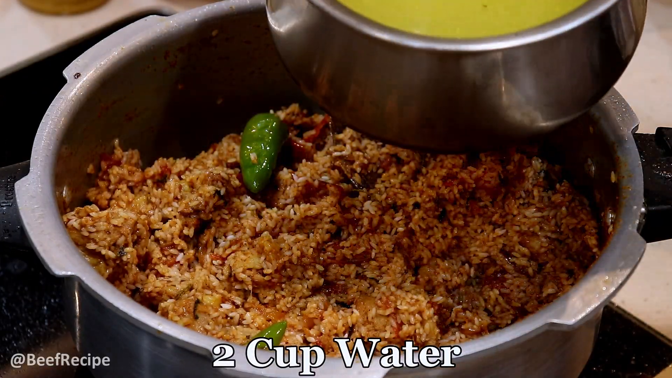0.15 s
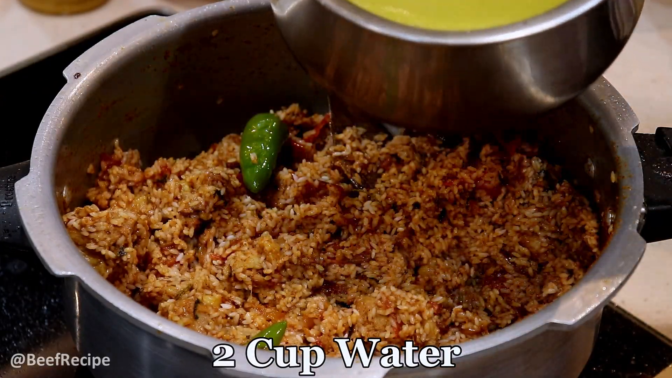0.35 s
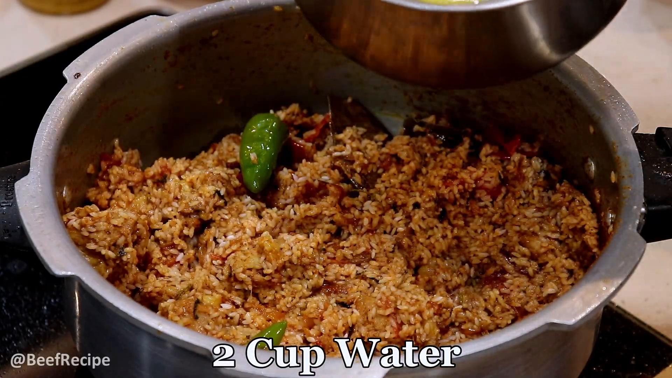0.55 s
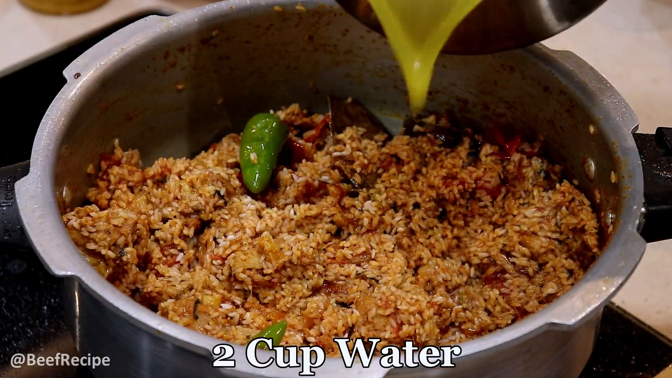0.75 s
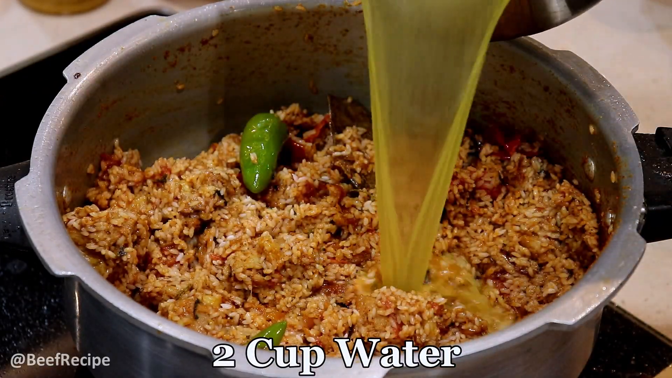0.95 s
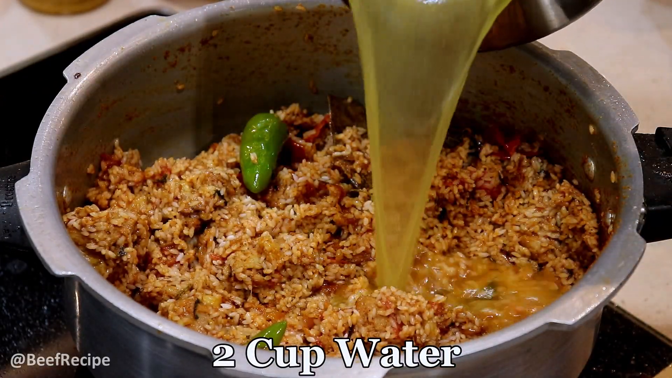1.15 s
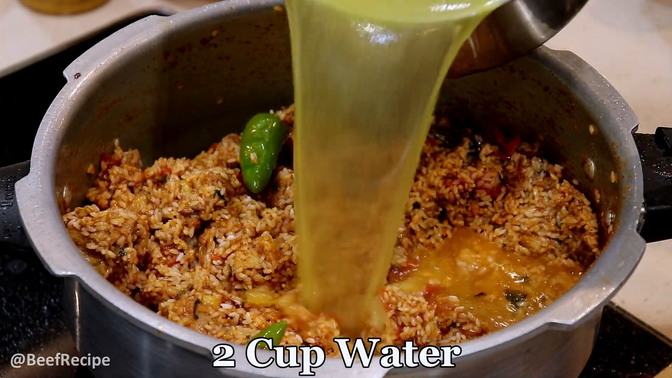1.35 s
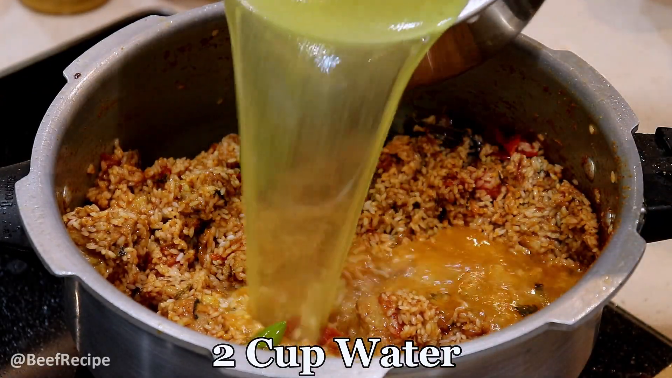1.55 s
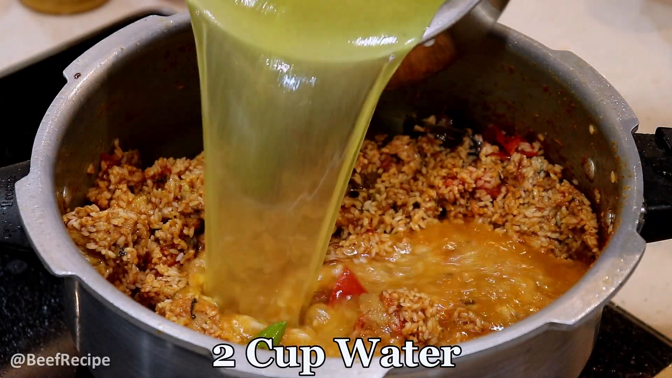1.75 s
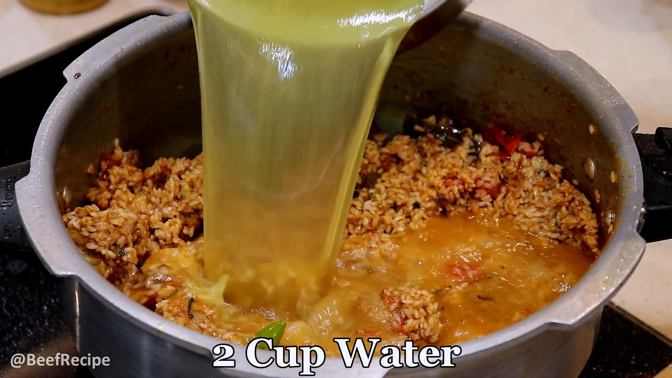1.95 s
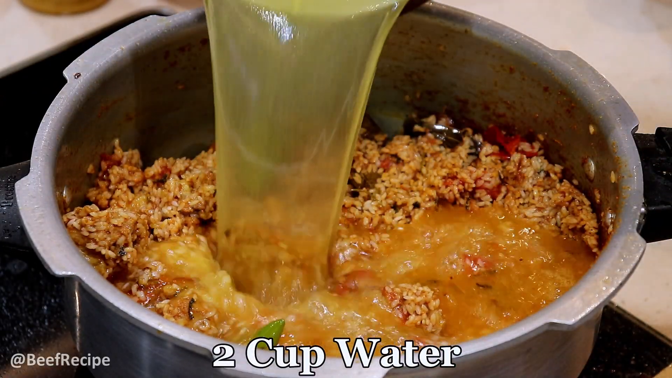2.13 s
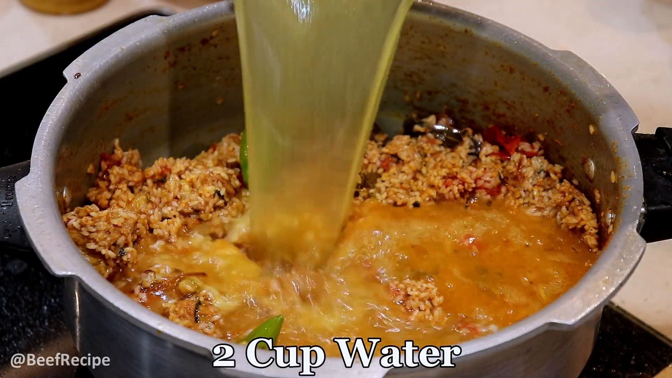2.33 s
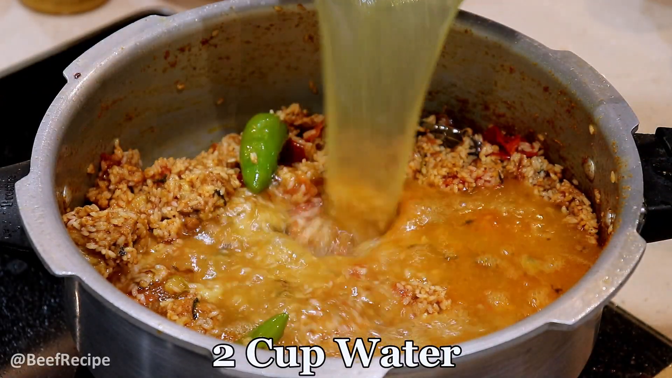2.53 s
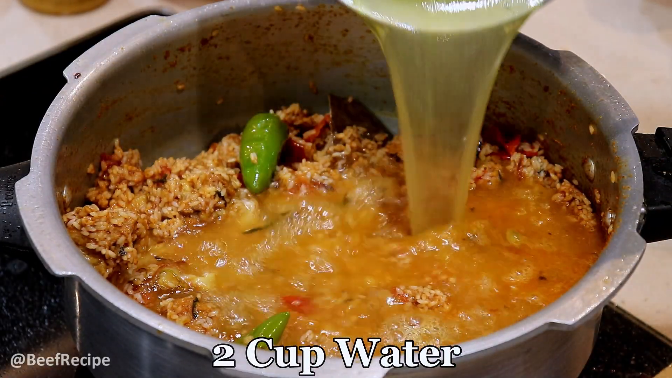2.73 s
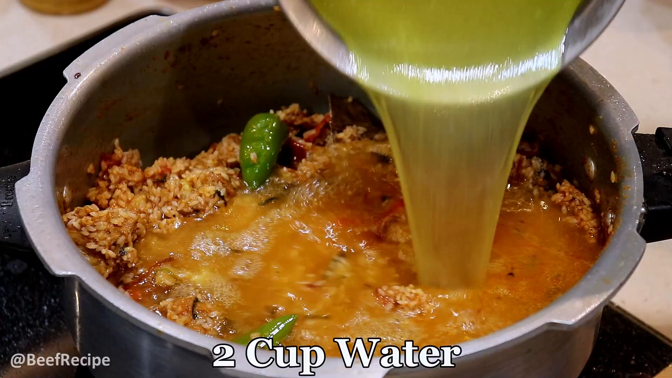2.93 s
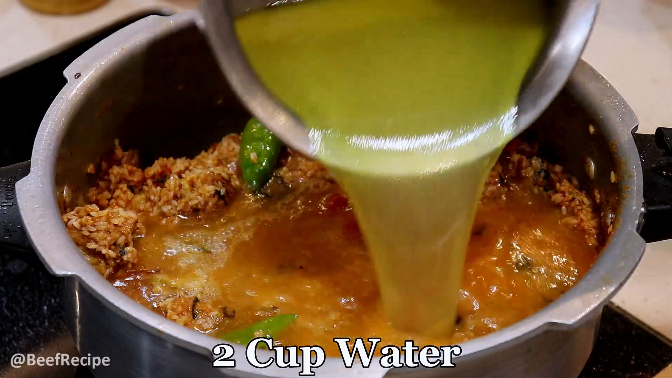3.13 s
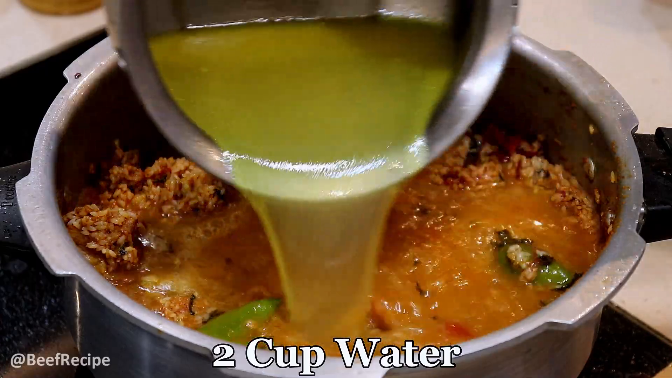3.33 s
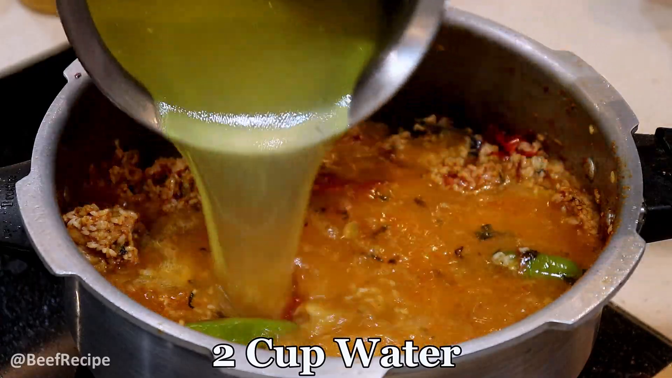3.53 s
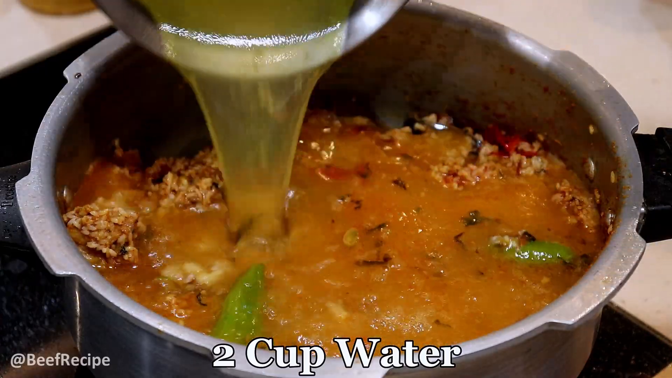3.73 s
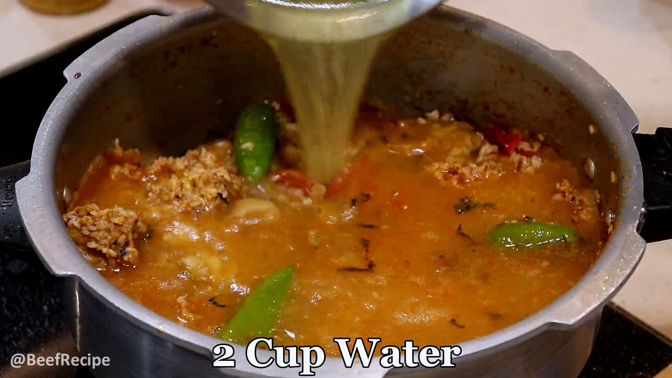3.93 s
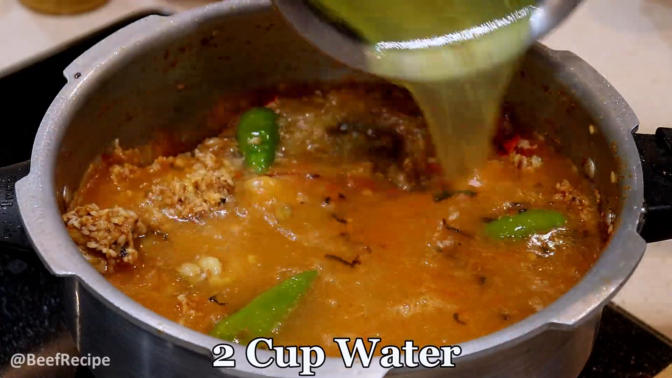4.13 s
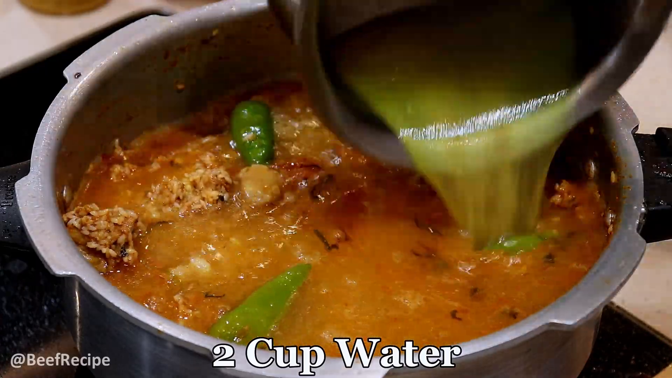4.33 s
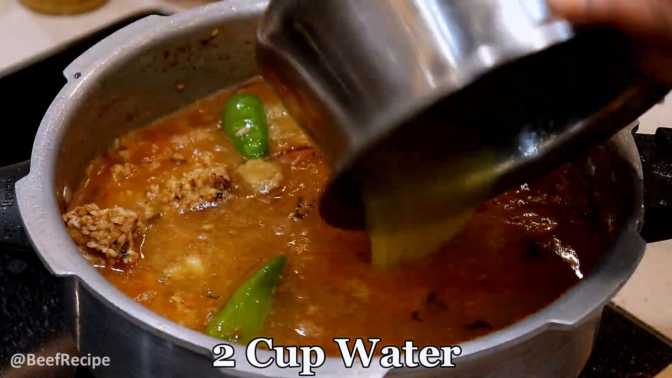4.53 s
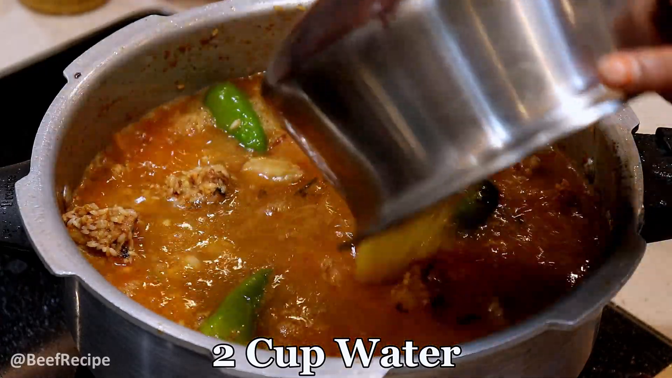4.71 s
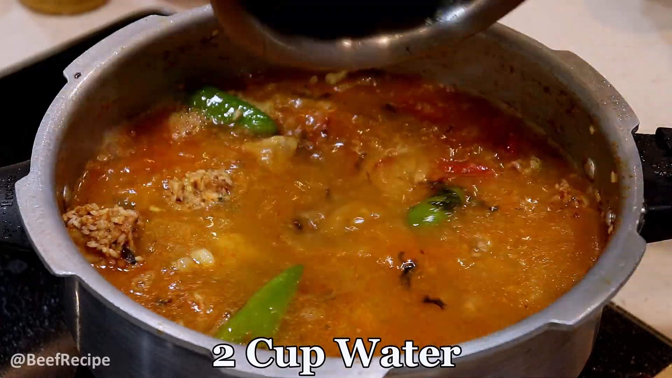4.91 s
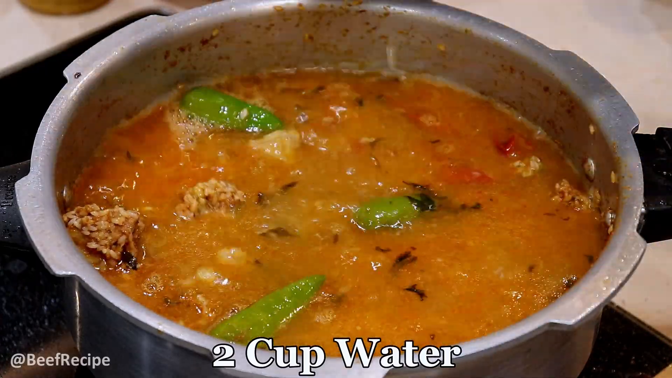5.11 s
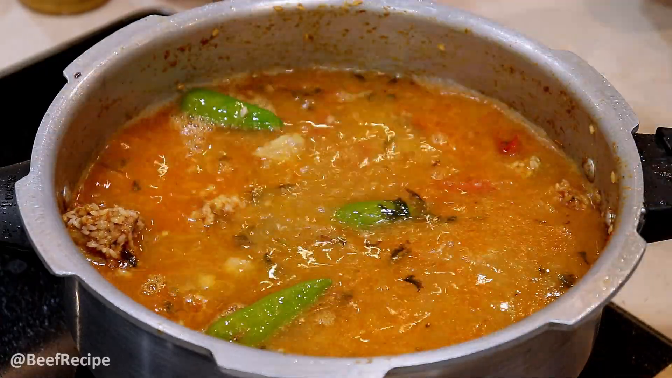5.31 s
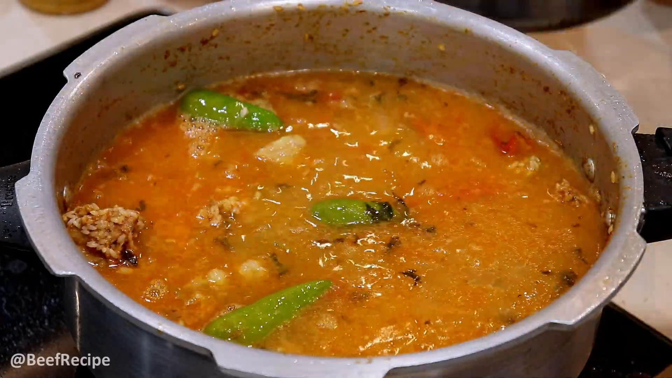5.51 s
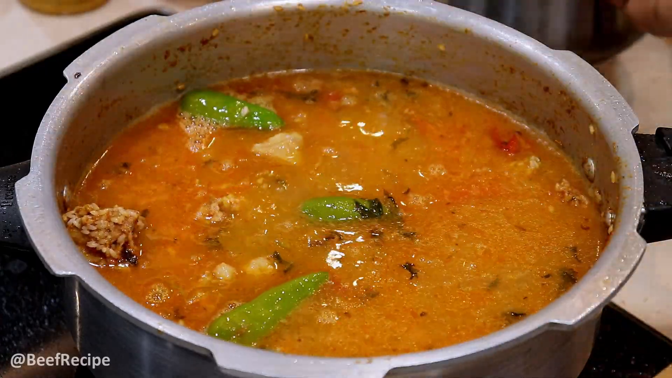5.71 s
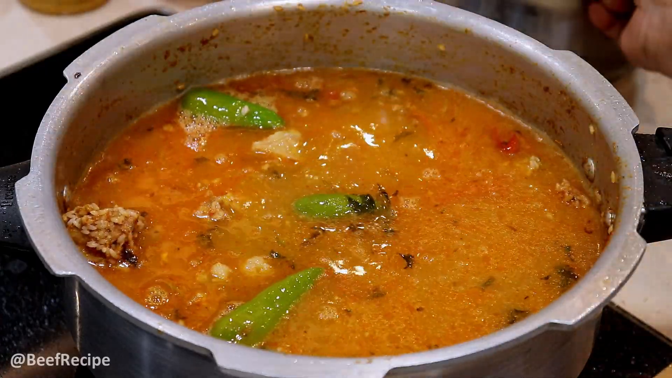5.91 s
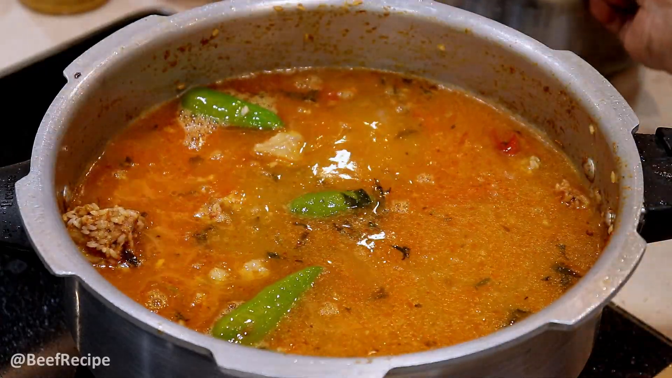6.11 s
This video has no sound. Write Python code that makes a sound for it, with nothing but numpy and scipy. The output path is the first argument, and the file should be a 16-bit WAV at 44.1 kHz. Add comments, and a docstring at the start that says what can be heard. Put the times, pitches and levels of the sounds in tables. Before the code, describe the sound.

Heard close from above a cooking pot in a small kitchen: low fan air and very faint sizzle, a sudden tiny snap, then pouring water. Hot rice crackles and hisses louder and louder, drops spit sharply, steam squeaks briefly and bubbles gurgle. The frying settles after the pour, a few bubbles plop, and a hollow steel vessel rings and rattles as it is set down.

```python
"""A hot pressure cooker of fried rice sizzles as water is poured in from a steel vessel; a kitchen fan runs.
Dense pops over hiss make the sizzle, which flares where water meets hot rice or bare metal, then settles.
A sharp tick comes before the pour; bursts of noise spit, and narrow noise whistles as steam in the rice.
Resonant noise and rising sine bubbles make the gurgling stream; fan air is shaped noise with motor tones.
At the end, decaying sine partials ring the empty vessel as it clanks, rocks and settles on the counter."""
import sys
import numpy as np
from scipy import signal
from scipy.fft import rfft, irfft
from scipy.io import wavfile

SR = 44100
rng = np.random.default_rng(int(sys.argv[2]) if len(sys.argv) > 2 else 0)


def to_wav(s):
    """Save 16-bit WAV."""
    ch = np.atleast_2d(s).T  # columns
    pcm = np.round(np.clip(ch, -1, 1) * 32767)  # PCM
    wavfile.write(sys.argv[1], SR, pcm.astype(np.int16))


N = 271788  # samples
TIME = np.arange(N) / SR


def gain_of(db):
    """Turns decibels into an amplitude factor."""
    return 10 ** (np.asarray(db) / 20)


def evened(x):
    """Scales to rms 1."""
    return x / np.sqrt(np.mean(x ** 2) + 1e-20)


def read(points, hz):
    """Reads a spectrum joined by straight lines over log frequency."""
    f, value = np.transpose(points)
    return np.interp(np.log(hz + 1), np.log(f + 1), value)


def add(mix, s, sound):
    """Mixes a sound in at s seconds, cut off at the end of the mix."""
    part = mix[max(round(s * SR), 0):][:len(sound)]
    part += sound[:len(part)]


def coloured(x, colour_db):
    """Filters x by a function from Hz to dB; rms 1."""
    hz = np.fft.rfftfreq(len(x), 1 / SR)
    return evened(irfft(rfft(x) * gain_of(colour_db(hz)), len(x)))


def resonate(x, hz, width):
    """A resonance, applied twice for steep skirts; rms 1."""
    r = np.exp(-np.pi * abs(width) * np.sqrt(2) / SR)
    pole = r * np.exp(2j * np.pi * hz / SR)
    return evened(signal.lfilter([1], np.poly([pole, pole]), x).real)


def dying(t, t60):
    """Exponential decay, falling 60 dB in t60 seconds."""
    return np.exp(-np.log(1000) * t / t60)


def burst(centre_hz, octaves, t60):
    """A sudden puff of noise around one pitch, dying away exponentially."""
    t = np.arange(SR // 2) / SR

    def band_db(f):
        return -10 * np.log10(1 + (np.log2((f + 1) / centre_hz) / octaves) ** 4)

    puff = coloured(rng.standard_normal(len(t)), band_db)
    return puff * dying(t, t60)


def patches(shape, frames, bins):
    """Smooth chance over time and frequency, rms 1; larger frames and bins make broader patches."""
    a, b = np.fft.fftfreq(shape[0])[:, None], np.fft.rfftfreq(shape[1])
    smoothing = np.exp(-(a * frames) ** 2 - (b * bins) ** 2)
    return evened(np.fft.irfft2(np.fft.rfft2(rng.standard_normal(shape)) * smoothing, shape))


def kitchen(x, t60, first_s=.003):
    """Sparse echoes from the pot wall, tiles and cupboards: random taps that die away."""
    t = np.arange(SR // 2) / SR
    hits = rng.random(len(t)) < 2000 / SR  # about 2000 echoes per second
    taps = rng.choice([-1, 1], len(t)) * hits * (t > first_s) * dying(t, t60)
    return signal.fftconvolve(x, taps / np.linalg.norm(taps))[:N]


# Steady frying of the whole pot, rising as it gets wet and sinking as it cools:
# (time [s], level [dB], fine spray [dB re level])
SIMMER = [(0, -49, 1), (1.0, -49, 1.5), (1.45, -35, 0.5), (2.9, -32.5, -2), (4.5, -29.5, -1.5),
          (5.0, -34, -1.5), (5.93, -43.5, 0.5)]
# Flares where water reaches hot rice or bare metal:
# (start [s], length [s], level [dB], fine spray [dB re level], coarse boiling [dB re level])
FLARES = [(0.742, 0.62, -54.5, -4, 13.5), (1.32, 0.42, -37, 3.5, -3), (1.57, 0.16, -40, -2, 8.5),
          (1.903, 0.16, -38.5, 1, -11), (2.264, 0.29, -30, 1, -0.5), (2.377, .16, -30, 0.5, -1.5),
          (2.56, 0.19, -31, -7, 0), (2.954, 0.59, -34.5, 2, -9.5), (3.547, 0.79, -29, -2.5, 3.5),
          (3.712, 0.54, -22.5, 3, -2), (3.964, .2, -25.5, 2, -8), (4.78, 0.091, -37, -7, -7),
          (5.09, 0.076, -35.5, 0, -11), (5.32, .2, -40, 3, 4.5)]
SIMMER_BOIL_DB = 1.7  # coarse boiling relative to the simmer
FLARE_RISE_S, FLARE_T60 = 0.083, 0.95  # seconds; the decay starts after the flare's length
SPRAY_FADE_DB_PER_S = 1.5  # the metal cools, so fine spray dies before the sizzle does


def frying_levels(t):
    """Sums simmer and flare power: sizzle in dB, then fine spray and coarse boiling in dB relative to it."""
    s, simmer_db, mist_db = np.transpose(SIMMER)
    power = gain_of(np.interp(t, s, simmer_db)) ** 2
    spray = power * gain_of(np.interp(t, s, mist_db)) ** 2
    boil = power * gain_of(SIMMER_BOIL_DB) ** 2
    for start, length, db, spray_db, boil_db in FLARES:
        age = np.maximum(t - start, 0)
        rise = np.minimum(age / FLARE_RISE_S, 1)
        flare = gain_of(db) * rise * dying(np.maximum(age - length, 0), FLARE_T60)
        power = power + flare ** 2
        spray = spray + (flare * gain_of(spray_db - SPRAY_FADE_DB_PER_S * age)) ** 2
        boil = boil + (flare * gain_of(boil_db)) ** 2
    return 10 * np.log10([power, spray / power, boil / power])


# Basic colour of the sizzle: (frequency [Hz], relative density [dB per Hz])
SIZZLE_COLOUR = [(200, -38), (650, -6), (900, -6), (1200, -4), (1700, -3.5), (2200, -4), (2800, 0),
                 (4400, -0.5), (5000, -1.5), (6800, -1), (8800, -7), (9800, -7.5), (13000, -13.5),
                 (16000, -21)]
# Pot air lifting and hollowing the sizzle:
# (centre [Hz], width [Hz], lift over dry rice [dB], lift when full of water [dB])
POT_AIR = [(670, 180, -7, -11), (784, 87, 5, -15.5), (874, 66, -1.5, 10.5), (1000, 140, 0, 1),
           (1170, 82, -2.5, -8), (1300, 160, 1.5, 0), (1710, 110, 3.5, -2.5), (2070, 460, -1, 1),
           (2250, 630, 1.5, -3), (2780, 240, 1.5, 1), (2930, 340, -1.5, 1.5), (3240, 160, -0.5, -5),
           (3450, 280, 1.5, 0), (4080, 270, 0, -1.5), (4400, 210, 2, 1), (5570, 470, 1, 1.5),
           (7200, 500, 0.5, 0.5), (8440, 330, 3, 4)]


def sizzle(pops_per_s=9000, size_db=3.5, pop_share=0.36, patch_db=1.0, flicker_db=0.49,
           filling_s=3.78, filled_s=3.96):
    """Thousands of tiny steam bubbles burst over a hiss; clusters of like size come and go."""
    sizes = np.minimum(rng.exponential(1, N), 3.5)
    happens = rng.random(N) < pops_per_s / SR
    pops = rng.choice([-1, 1], N) * gain_of(size_db * sizes) * happens
    share = np.clip(pop_share, 0, 1)  # of the power
    frying = np.sqrt(share) * evened(pops) + np.sqrt(1 - share) * rng.standard_normal(N)
    hz, t, z = signal.stft(frying, SR, nperseg=512, noverlap=384)
    hz = hz[:, None]
    level, spray, boil = frying_levels(t)
    # fresh water on bare metal throws fine spray; deeper water boils coarsely
    colour = read(SIZZLE_COLOUR, hz) + spray * read([(6000, 0), (12000, 1)], hz)
    colour = colour + boil * read([(1800, 1), (3500, 0)], hz)
    # once water covers the rice, the air above it rings more clearly
    full = np.clip((t - filling_s) / (filled_s - filling_s), 0, 1)
    for centre, width, dry_db, full_db in POT_AIR:
        lift_db = dry_db + full * (full_db - dry_db)
        colour = colour + lift_db * np.exp(-2 * ((hz - centre) / width) ** 2)
    # the main band sets the loudness, so the colour leaves the level alone
    main = (hz > 2500) & (hz < 9000)
    colour = colour - 10 * np.log10(np.mean(gain_of(colour) ** 2 * main, 0))
    clusters = patch_db * patches(z.T.shape, frames=13.3, bins=9.3)
    flicker = flicker_db * patches(z.T.shape, frames=4.6, bins=200)
    z = z * gain_of(colour + level + (clusters + flicker).T)
    return signal.istft(z, SR, nperseg=512, noverlap=384)[1][:N]


# Motor tones: (frequency [Hz], level [dB])
HUM = [(301.5, -60.5), (398.6, -52)]
# Colour of the rush of air: (frequency [Hz], relative density [dB per Hz])
FAN = [(25, -26), (55, -33), (78, -15), (100, -19), (125, -9), (180, -7.5), (230, -7.5), (300, -5.5),
       (350, -8), (400, -10), (450, -9.5), (620, -8), (900, -12.5), (1650, -13.5), (2100, -24), (4000, -44)]
FAN_DB = -46  # level of the rush


def fan():
    """A rush of air as shaped noise, with motor tones whose pitch drifts slightly."""
    rush = coloured(rng.standard_normal(N), lambda f: read(FAN, f))
    drift_hz = .8 * coloured(rng.standard_normal(N), lambda f: -20 * np.log10(1 + (f / 5) ** 2))
    tones = np.zeros(N)
    for hz, db in HUM:
        tone = np.sin(2 * np.pi * np.cumsum(hz + drift_hz) / SR)
        tones += gain_of(db) * evened(tone)
    return gain_of(FAN_DB) * rush + tones


TICK_S, TICK_DB, TICK_HZ = .2536, -10.5, 6250


def tick(snap_t60=0.00075, crack_db=-17, crack_t60=0.011, tail_db=-32, tail_t60=.07):
    """One sharp snap before the pour: a very short sine with a crack and a bright tail of noise."""
    t = np.arange(SR // 2) / SR
    snap = np.sin(2 * np.pi * TICK_HZ * t) * dying(t, snap_t60)
    crack = gain_of(crack_db) * burst(TICK_HZ, octaves=.65, t60=crack_t60)
    tail = gain_of(tail_db) * burst(TICK_HZ, octaves=0.55, t60=tail_t60)
    out = np.zeros(N)
    add(out, TICK_S, gain_of(TICK_DB) * (snap + crack + tail))
    return out


# The loudest drops spitting on hot metal: (time [s], level [dB], centre [Hz], t60 [s])
SPITS = [(.388, -44, 4000, .076), (1.04, -38.5, 6900, .06), (1.155, -38, 5900, .06),
         (1.1988, -34, 7540, .09), (1.348, -28, 5670, .06), (1.385, -34.5, 9400, 0.27),
         (1.94, -30, 6500, .12), (3.092, -25, 6760, .06), (3.1924, -22, 5360, 0.15),
         (4.103, -17.5, 5300, 0.072), (4.146, -16.5, 5700, .09)]
SPIT_OCTAVES = 0.31  # bandwidth of the loudest drops


def spits(count=18, first_s=1.15, last_s=1.7, small_db=1, small_hz=5800, spread_octaves=2,
          small_octaves=0.16, small_t60=0.045):
    """Single drops flash into steam; many small ones scatter as the water first meets the hot pot."""
    out = np.zeros(N)
    for s, db, hz, t60 in SPITS:
        add(out, s, gain_of(db) * burst(hz, SPIT_OCTAVES, t60))
    for when, pitch in rng.random((count, 2)):
        s = first_s + when * (last_s - first_s)
        hz = small_hz * 2 ** (spread_octaves * (pitch - .5))
        level_db = frying_levels(s)[0] + small_db  # small drops follow the sizzle
        add(out, s, gain_of(level_db) * burst(hz, small_octaves, small_t60))
    return out


# Steam squeezing through the rice: (start [s], length [s], pitch [Hz], level [dB])
STEAM = [(0.773, 0.31, 1470, -49.5), (0.992, 0.085, 2730, -55), (1.102, .14, 5700, -45.5),
         (1.168, .2, 3510, -46.5), (1.273, .08, 2200, -45), (1.339, .5, 3460, -40.5),
         (1.67, 0.17, 5240, -37), (2.361, .18, 2750, -35.5), (2.382, .32, 3420, -43), (2.59, .2, 4430, -35),
         (2.596, .17, 6200, -34.5), (2.991, 0.23, 2600, -40.5), (3.01, 0.071, 6340, -37),
         (3.1, .06, 8050, -34), (3.202, 0.41, 3480, -36), (3.205, 0.36, 4490, -36), (3.362, 0.1, 3940, -35),
         (3.992, 0.086, 6230, -23), (4.107, 0.037, 7500, -21.5)]
# base width, widening with pitch; above BREATHY_HZ whistles widen quickly into a hiss
WHISTLE_WIDTH_HZ, BREATHY_HZ = 150, 4440


def steam(fade=0.2, sputter_db=2.5, sputter_hz=60):
    """Each pocket of steam gives a brief, sputtering whistle of narrow noise; high ones are breathier."""
    out = np.zeros(N)
    for start, length, hz, db in STEAM:
        size = max(int(length * SR), 100)
        width = WHISTLE_WIDTH_HZ * (1 + (hz / BREATHY_HZ) ** 4)
        sputter = coloured(rng.standard_normal(SR), lambda f: -20 * np.log10(1 + (f / sputter_hz) ** 4))
        breath = rng.standard_normal(SR) * gain_of(sputter_db * sputter)
        whistle = evened(resonate(breath, hz, width)[-size:])
        add(out, start, gain_of(db) * whistle * signal.windows.tukey(len(whistle), fade))
    return out


def bubble(hz, cycles, rise=0.052):
    """Trapped air rings briefly, its pitch rising as it surfaces."""
    t, life = np.arange(SR // 8) / SR, cycles / hz
    ring = np.sin(2 * np.pi * hz * t * (1 + rise * t / life))
    return ring * dying(t, life) * (1 - np.exp(-t * hz))


# The falling stream: (time [s], level [dB])
STREAM = [(.9, -70), (1.3, -49.5), (1.7, -47.5), (2.5, -45.5), (3.1, -41), (4.8, -43), (5.9, -50.5)]
# Hollow of the pot under the stream: (centre [Hz], width [Hz], relative level [dB])
HOLLOW = [(167, 97, -8), (290, 110, -8.5), (384.6, 83, 1), (460, 89, -4.5), (800, 133, -2), (886, 240, -7)]
# Large air bubbles under the stream: (time [s], pitch [Hz], level [dB])
GULPS = [(1.158, 755, -37), (1.172, 1110, -30), (4.958, 930, -25.5), (5.04, 950, -27)]


def stream(count=420, bubble_db=-5, size_db=5.0, lowest_hz=90):
    """The stream churns in the hollow of the pot, as resonant noise, and drags air bubbles under."""
    churn = sum(gain_of(db) * resonate(rng.standard_normal(N), hz, w) for hz, w, db in HOLLOW)
    low_cut = signal.butter(2, lowest_hz, "high", fs=SR, output="sos")
    churn = evened(signal.sosfilt(low_cut, churn))
    bubbles = np.zeros(N)
    for when, smallness, strength in rng.random((count, 3)):
        loudness = gain_of(-size_db * np.log(strength + 0.0089))  # a few are much louder
        add(bubbles, when * N / SR, loudness * bubble(650 * 4 ** smallness, cycles=13))
    level = gain_of(np.interp(TIME, *np.transpose(STREAM)))
    out = level * (churn + gain_of(bubble_db) * evened(bubbles))
    for s, hz, db in GULPS:
        add(out, s, gain_of(db) * bubble(hz, cycles=37))
    return out


# Ring of the steel vessel: (frequency [Hz], relative level [dB], t60 [s])
VESSEL = [(387, -29, 1.5), (775, -19, 0.15), (926, -7.5, 0.14), (1020.5, -0.5, 0.69), (1414, -15, 0.63),
          (1750, -30, .6), (2140, -28.5, .39), (2420, -32, .15), (2397, -10.5, 0.26), (2446, -15, 0.39),
          (3070, -26, .24), (3140, -20.5, 0.25), (4200, -32, .4), (4530, -24, 0.44), (5570, -26, .35),
          (6860, -26, .15), (7500, -36, .2), (8317, -35, .49)]
# The vessel rocks on the counter and settles: (time [s], ring [dB], thud [dB], scrape [dB])
KNOCKS = [(5.9856, -39, -27.5, -57), (5.9904, -15.5, -18.5, -32.5), (6.029, -18, -39, -49),
          (6.093, -24.5, -32.5, -41), (6.104, -28, -54, -62)]


def clank(counter_db=-17, counter_hz=155, thud_hz=840, thud_t60=0.035, damped_t60=0.048):
    """The empty vessel rings as the counter thuds; each contact damps the last ring and starts another."""
    rings, blows, t = np.zeros(N), np.zeros(N), np.arange(SR // 2) / SR
    next_contact = [row[0] for row in KNOCKS[1:]] + [np.inf]
    for (s, ring_db, thud_db, scrape_db), stop in zip(KNOCKS, next_contact):
        ring = sum(gain_of(db) * np.sin(2 * np.pi * hz * t) * dying(t, t60) for hz, db, t60 in VESSEL)
        damping = dying(np.maximum(s + t - stop + 0.0037, 0), damped_t60)  # sets in 3.7 ms early
        ring = ring * (1 - np.exp(-t / 0.00067)) * damping
        thud = np.sin(2 * np.pi * thud_hz * t) * dying(t, thud_t60) * (1 - np.exp(-t * thud_hz))
        boom = burst(centre_hz=counter_hz, octaves=0.36, t60=0.55) * (1 - np.exp(-t / 0.0057))
        scrape = burst(centre_hz=5340, octaves=0.42, t60=0.089)
        add(rings, s, gain_of(ring_db) * ring)
        add(blows, s, gain_of(thud_db) * (thud + gain_of(counter_db) * boom))
        add(blows, s, gain_of(scrape_db) * scrape)
    # so small a thing radiates no deep bass
    low_cut = signal.butter(3, 80, "high", fs=SR, output="sos")
    direct = signal.sosfilt(low_cut, rings + blows)
    return direct + gain_of(-12) * kitchen(direct, t60=.45)


def scene(pot_db=0.):
    """Everything reaches one microphone above the pot, heard alike in both channels."""
    pot = gain_of(pot_db) * (sizzle() + tick() + spits() + steam() + stream())
    echoes = gain_of(-12) * kitchen(pot, t60=.3)
    mono = pot + echoes + fan() + clank()
    return np.array([mono, mono])


EDGE_HZ = 15850  # upper band limit


def record(dry):
    """The recorder's band limit, a steep low-pass."""
    low_pass = signal.firwin(801, EDGE_HZ, window=("kaiser", 9), fs=SR)
    return signal.oaconvolve(dry, low_pass[None], "same")


dry = scene()
out = record(dry)
to_wav(out)
```